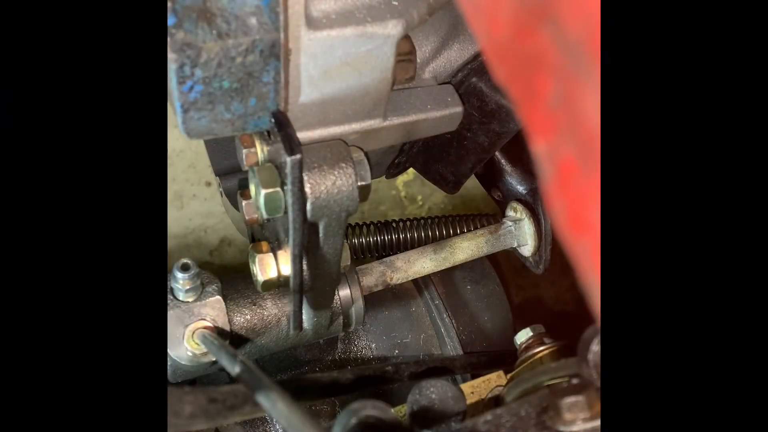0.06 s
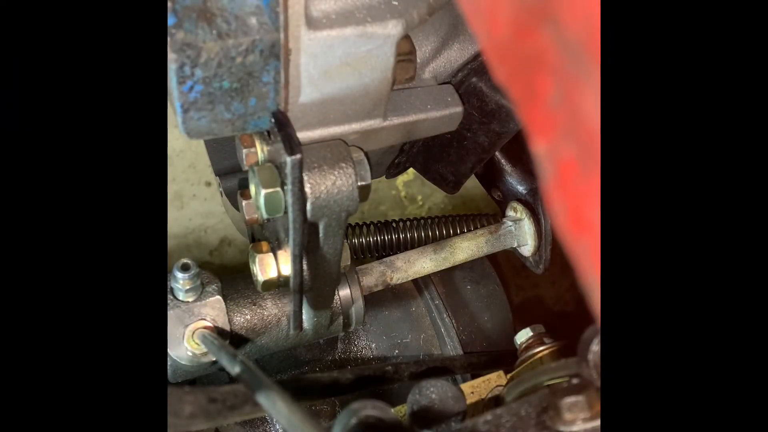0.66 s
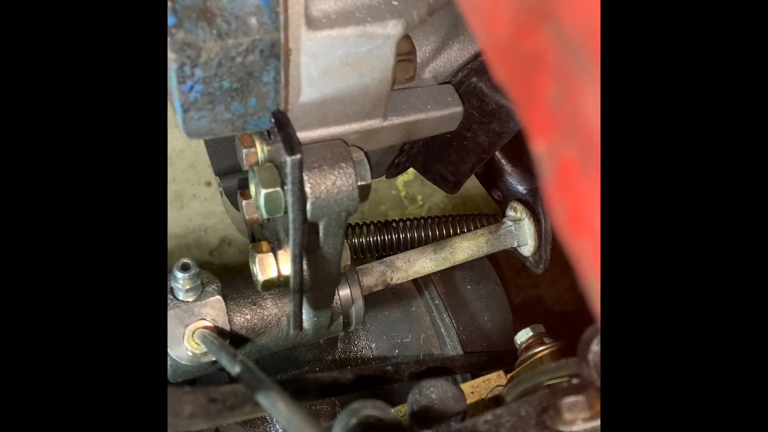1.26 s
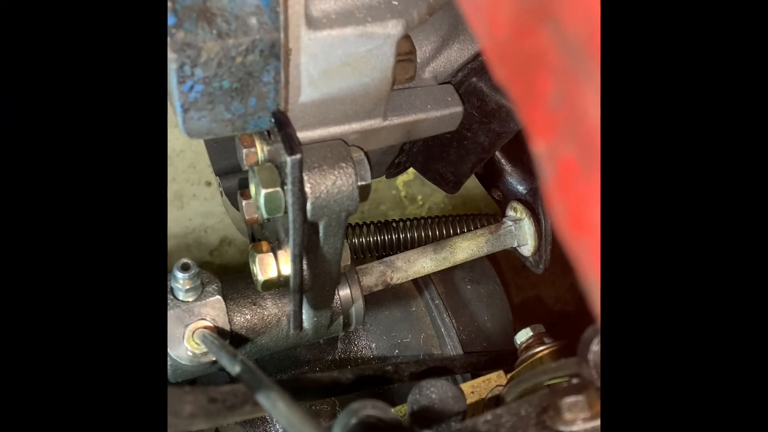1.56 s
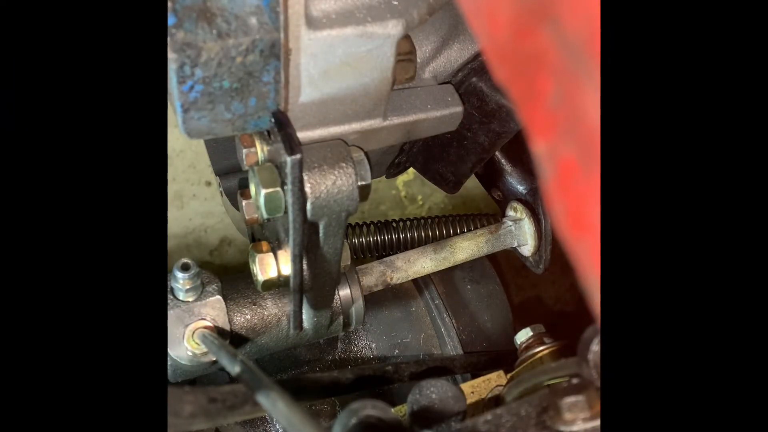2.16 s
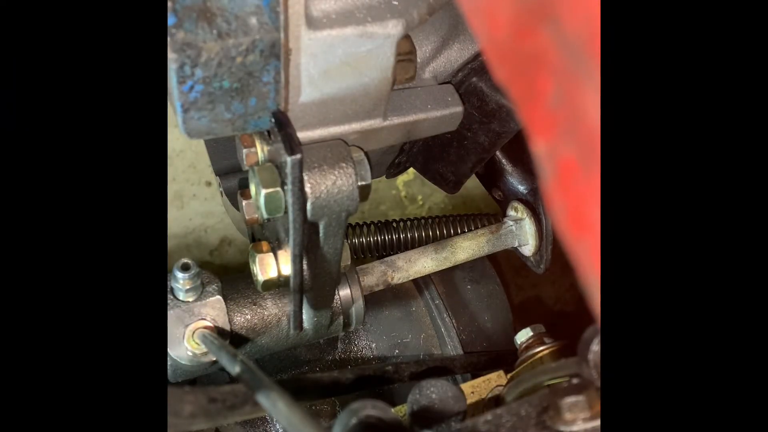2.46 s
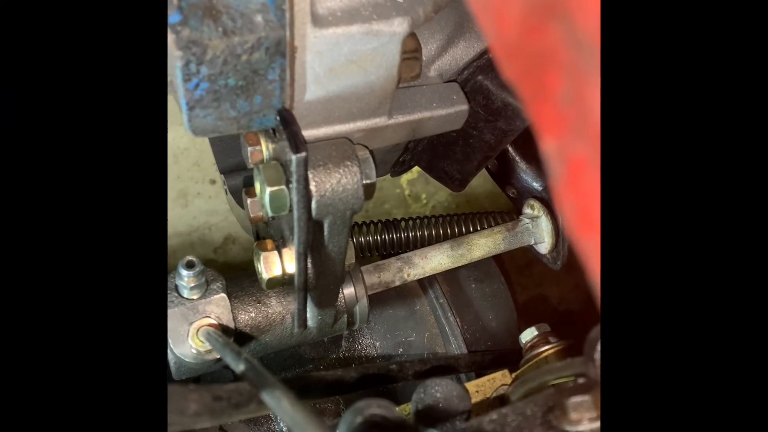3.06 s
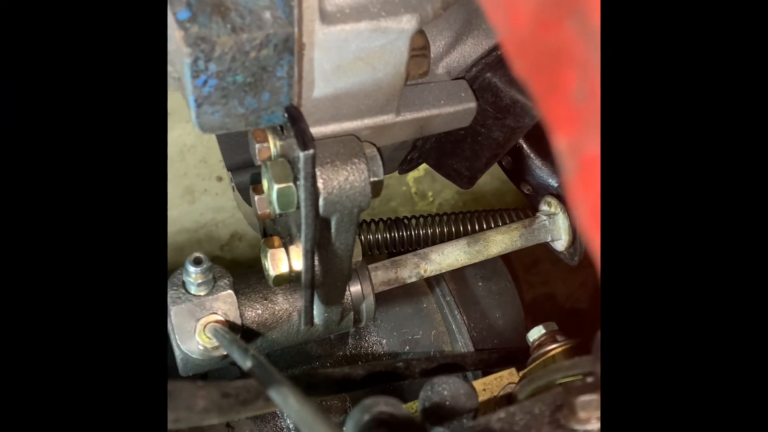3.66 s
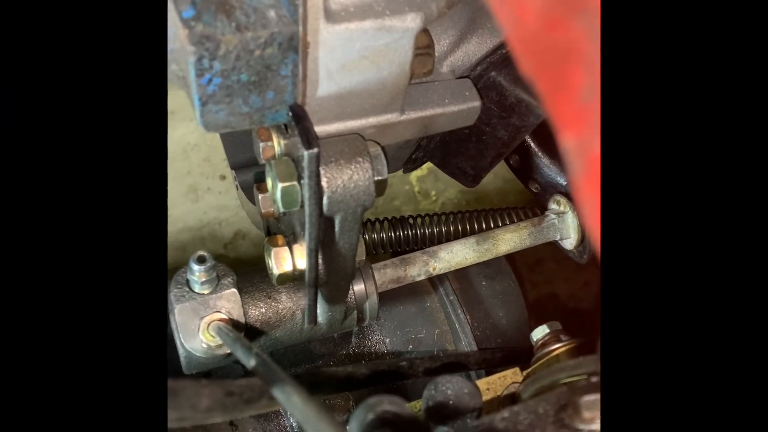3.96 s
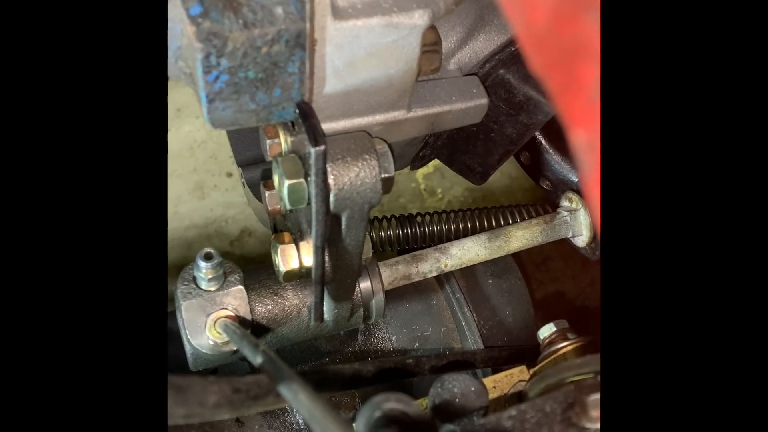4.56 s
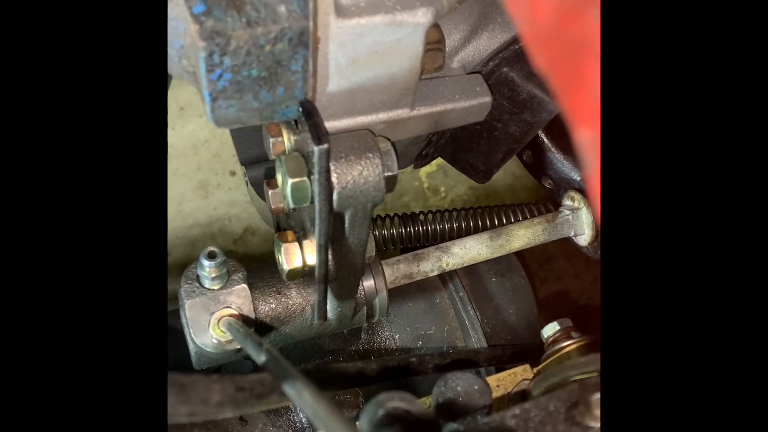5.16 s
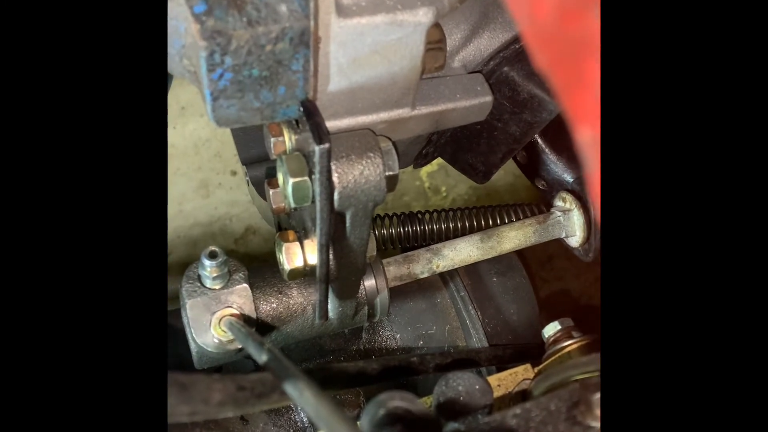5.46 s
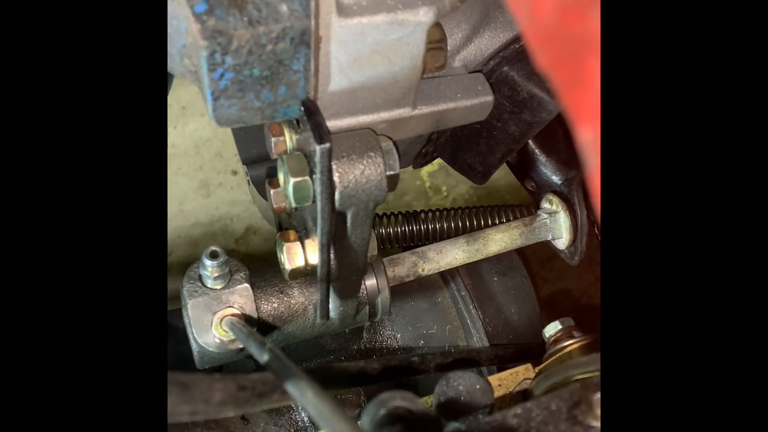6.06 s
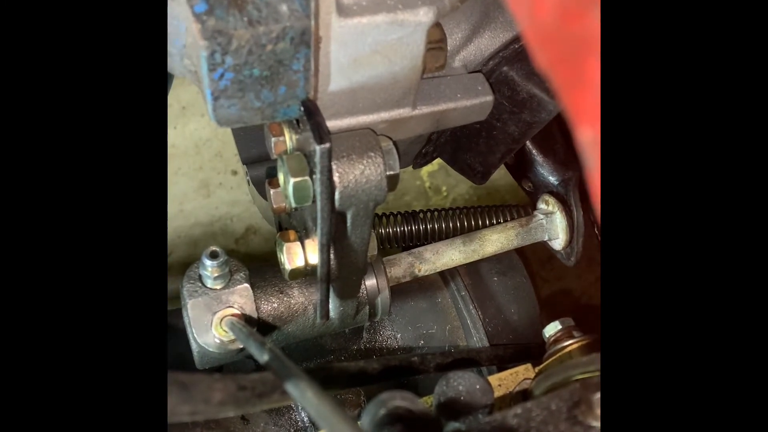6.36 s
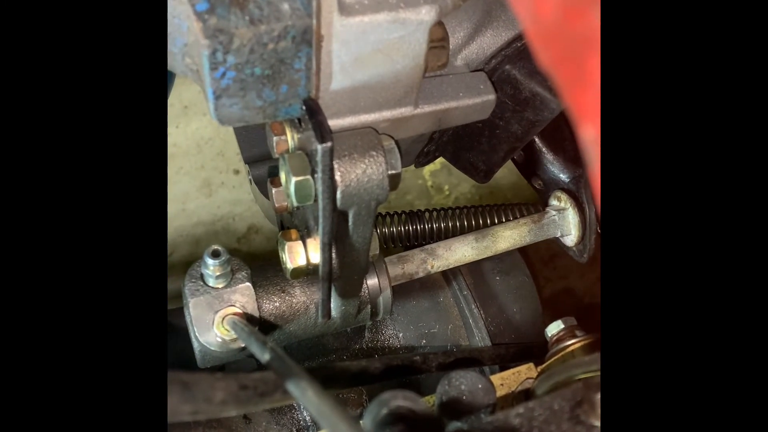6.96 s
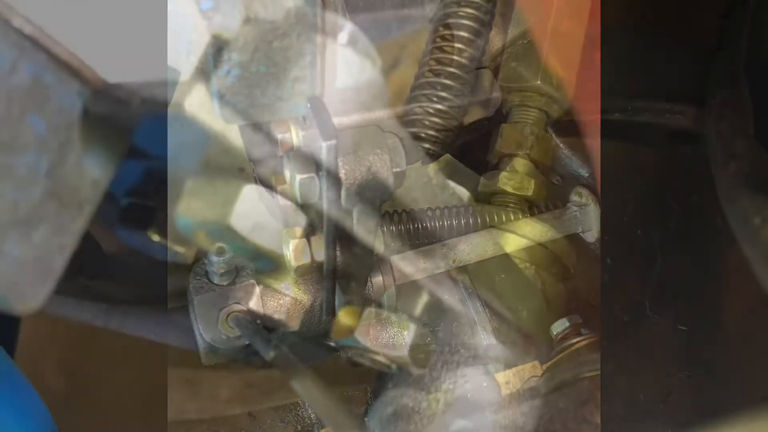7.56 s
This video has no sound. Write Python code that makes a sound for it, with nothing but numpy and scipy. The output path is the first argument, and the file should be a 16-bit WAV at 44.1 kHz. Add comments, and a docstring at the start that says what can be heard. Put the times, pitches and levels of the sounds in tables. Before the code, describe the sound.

Steel linkage clunks, scrapes and judders against a spring, then snaps back, with small ticks and clothing rustling close by.

```python
"""Clothing rustles close by over a quiet workshop rumble, and small steel parts tick under a vehicle.
A clutch push rod is driven out against its return spring: the linkage takes up with a clunk, scrapes,
judders, groans and squeaks once. Let back, the rod rubs and sings, and the lever snaps onto its stop.
Impacts excite damped modes and bursts of noise; sliding friction is a stream of tiny random slips.
Two microphone ports hear the scene with slightly different phase and level."""
import sys
import numpy as np
from scipy import signal
from scipy.fft import rfft, irfft, next_fast_len
from scipy.io import wavfile
from scipy.ndimage import map_coordinates

SR = 44100
rng = np.random.default_rng(int(sys.argv[2]) if len(sys.argv) > 2 else 0)


def inscribe(sig):
    """Save sig as 16-bit PCM at rate SR to the path in sys.argv[1].

    A 1-D sig is mono; a 2-D sig holds one channel per row.
    Samples are clipped to [-1, 1] before scaling.
    """
    pcm = np.round(np.clip(np.atleast_2d(sig).T, -1, 1) * 32767)
    wavfile.write(sys.argv[1], SR, pcm.astype(np.int16))


N = 344156
TIME = np.arange(N) / SR
AGE = np.arange(SR * 3 // 4) / SR  # seconds since the onset of one short sound

# modes of the linkage's bracket: pitch_hz, level_db, t60_s
BRACKET_MODES = [(183, -9, 0.3), (274, -3.5, 0.25), (421, -5, 0.2), (549, -1, 0.27), (622, -10, 0.18),
                 (739, -7.5, 0.22), (944, 0.5, 0.21), (1036, -1.5, 0.14), (1200, -0.5, 0.12),
                 (1265, -2, 0.15), (1543, -6, 0.15), (1778, -2, 0.11), (2080, 1.5, 0.09), (2800, -4, 0.07),
                 (3040, -10, 0.08)]
# bright modes of the return spring: pitch_hz, level_db, t60_s
SPRING_MODES = [(3600, -1.5, 0.016), (4080, 6, 0.018), (4800, -6.5, .015), (5400, 0.5, 0.02),
                (6790, -0.5, .018), (8800, -2, 0.0065), (9450, -4.5, .008), (9900, -1, 0.0084),
                (11800, -5, 0.0079), (14650, -5, .007)]
# spectrum of fine friction, in cloth fibres and spring coils: frequency_hz, level_db
HISS_SPECTRUM = [(900, 0), (2500, -0.5), (4000, 2.5), (6000, -1), (9000, -11), (12000, -13), (15500, -18)]


def amp(db):
    """Decibels as an amplitude ratio."""
    return 10 ** (np.asarray(db) / 20)


def unit(x):
    """Normalisation to rms 1."""
    return x / np.sqrt(np.mean(x ** 2) + 1e-20)


def along(points, hz):
    """Interpolation of (frequency_hz, value) points on a logarithmic frequency axis."""
    frequencies, values = np.transpose(points)
    return np.interp(np.log(hz + 1), np.log(frequencies + 1), values)


def filtered(x, response):
    """Linear filtering: the spectrum of x times a frequency response."""
    n = x.shape[-1]
    padded = next_fast_len(n + SR // 4)
    return irfft(rfft(x, padded) * response(np.fft.rfftfreq(padded, 1 / SR)), padded)[..., :n]


def coloured(x, spectrum):
    """Spectral shaping by (frequency_hz, level_db) points, at rms 1."""
    return unit(filtered(x, lambda hz: amp(along(spectrum, hz))))


def noise(spectrum, size=len(AGE)):
    """Gaussian noise with a given spectrum, at rms 1."""
    return coloured(rng.standard_normal(size), spectrum)


def fade(t60_s):
    """Exponential decay, by 60 dB in t60_s."""
    return np.exp(-np.log(1000) * AGE / max(t60_s, 1e-3))


def swell(rise_s):
    """Exponential build-up with time constant rise_s."""
    return 1 - np.exp(-AGE / max(rise_s, 1e-5))


def gesture(start_s, attack_s, length_s, release_s):
    """A movement's envelope: smooth attack, hold until length_s after the start, exponential release."""
    age = TIME - start_s
    rise = np.sin(np.pi / 2 * np.clip(age / max(attack_s, 1e-3), 0, 1)) ** 2
    return rise * np.exp(-np.maximum(age - length_s, 0) / max(release_s, 1e-3))


def bell_curve(x, centre, width):
    """A Gaussian window of height 1."""
    return np.exp(-.5 * ((x - centre) / width) ** 2)


def wander(per_s):
    """Random modulation: a smooth curve through per_s random values a second."""
    return map_coordinates(rng.standard_normal(1024), [TIME * per_s], mode="mirror")


def add(track, start_s, sound):
    """Superposition of a sound on the track."""
    part = track[round(start_s * SR):][:len(sound)]
    part += sound[:len(part)]


def ring(modes):
    """Free vibration: damped modes of slightly random strength, starting at rms 1."""
    strengths = amp(np.array(modes)[:, 1] + rng.standard_normal(len(modes)))
    waves = [np.sin(2 * np.pi * (hz * AGE + rng.random())) * fade(t60_s) for hz, _, t60_s in modes]
    return strengths @ waves / np.sqrt(np.sum(strengths ** 2) / 2)


def resonate(x, modes):
    """Forced vibration: x convolved with the modes' impulse response, at rms 1."""
    return unit(signal.fftconvolve(x, ring(modes))[:N])


def bands(x, count=14):
    """A filter bank of overlapping bands that sum to x: (centre_hz, signal) pairs."""
    centres = np.geomspace(40, 16000, count)
    return [(c, filtered(x, lambda hz: along(np.c_[centres, centres == c], hz))) for c in centres]


def clang(spectrum, decay, cycles):
    """Modal overlap: noise bands build up over some cycles and decay by (frequency_hz, t60_s) points."""
    return sum(x * swell(cycles / hz) * fade(along(decay, hz)) for hz, x in bands(noise(spectrum)))


def friction(per_s, spread_db, smooth):
    """Friction as shot noise: random slips of uneven size over a smooth hiss."""
    impulses = (rng.random(N) < per_s / SR) * rng.choice([-1, 1], N)
    slips = impulses * amp(spread_db * rng.standard_normal(N))
    return unit(unit(slips) + smooth * rng.standard_normal(N))


def workshop(x, wet_db, rise_s):
    """Reverberation: the underbody, floor and walls add a diffuse tail."""
    # reverberation times: frequency_hz, t60_s
    room_decay = [(100, 0.37), (500, 0.6), (2000, 0.54), (6000, 0.42), (14000, 0.15)]
    tail = clang([(100, 2), (4000, -0.58), (15000, -1.8)], room_decay, cycles=1) * swell(rise_s)
    return x + amp(wet_db) * signal.fftconvolve(x, tail / np.linalg.norm(tail))[:N]


def rumble(fade_start_s=7.475, fade_db_per_s=62):
    """Ambient noise: the workshop's low background wanders slightly in level; from about 7.5 s the background
    fades out."""
    # background spectrum: frequency_hz, level_db
    spectrum = [(25, -28.5), (58, -4), (110, -5.5), (170, -2.5), (300, -2), (430, -2), (700, -11),
                (1050, -9.5), (1550, -18), (1850, -13.5), (2400, -24), (4200, -28), (7000, -41),
                (15500, -48.5)]
    level_db = -53.5 - 0.9 * wander(per_s=3.8) - fade_db_per_s * np.maximum(TIME - fade_start_s, 0)
    return amp(level_db) * noise(spectrum, size=N)


def rustle():
    """Friction noise of cloth: in each stroke the folds sound low while the fibres catch and hiss."""
    # strokes of cloth: start_s, length_s, hiss_db, body_over_hiss_db
    strokes = [(-.05, 0.21, -66.5, -5), (0.388, 0.3, -61.5, -13), (0.943, 0.16, -70, -1),
               (1.079, 0.025, -44, 1), (1.351, 0.096, -56.5, 10), (1.555, 0.13, -50.5, -6),
               (1.849, 0.038, -42, -11), (2.8, 0.22, -57.5, 9.5), (3.523, 0.28, -66, 12),
               (3.813, 0.21, -62.5, 11.5), (4.44, 0.2, -72.5, 1), (5.93, 0.085, -65, -6),
               (6.494, 0.095, -64, 11.5), (7.408, 0.12, -62.5, 7), (7.51, 0.04, -60.5, 12.5)]
    # spectrum of the folds: frequency_hz, level_db
    fold_spectrum = [(70, -15.5), (160, -3.5), (285, 6.5), (450, -1), (800, -7), (1300, -8), (2200, -17.5),
                     (4000, -32)]
    body, hiss = np.zeros(N), np.zeros(N)
    for start_s, length_s, hiss_db, body_over_hiss_db in strokes:
        stroke = amp(hiss_db) * gesture(start_s, 0.48 * length_s, length_s, release_s=0.045)
        hiss = np.hypot(hiss, stroke)  # incoherent sources add in power
        body = np.hypot(body, stroke * amp(body_over_hiss_db))
    uneven_drag = amp(1.5 * wander(per_s=39))
    folds = coloured(friction(per_s=1400, spread_db=1.5, smooth=0.93), fold_spectrum)
    fibres = coloured(friction(per_s=1100, spread_db=3.5, smooth=0.8), HISS_SPECTRUM)
    return uneven_drag * (amp(1) * body * folds + amp(2.5) * hiss * fibres)


def ticks():
    """Impulse excitation: shifting pins and coils click and ring the spring, over a longer knock."""
    # small steel contacts: start_s, click_db, knock_db
    contacts = [(0.4932, -41.5, -39), (0.6164, -41.5, -44), (1.083, -42, -33), (1.8698, -28, -34),
                (2.2236, -31.5, -39), (2.474, -60, -36.5), (2.8623, -50, -34), (3.673, -35, -50),
                (3.6854, -26.5, -40), (3.692, -30, -49), (3.7436, -33.5, -46), (3.787, -32.5, -59),
                (3.975, -38, -40), (4.6214, -44, -61), (4.6631, -38.5, -54), (4.675, -42, -52),
                (4.774, -41, -46), (4.8289, -42, -55), (4.846, -42, -41), (4.873, -43, -40.5),
                (5.9417, -36.5, -45), (5.9725, -43, -51), (6.0125, -33.5, -43), (6.0233, -42, -32),
                (6.0543, -38, -34), (6.5224, -30.5, -45)]
    click_spectrum = [(1200, -22.5), (2500, -4.5), (4500, 5.5), (8000, -2.5), (12000, -8), (15500, -12)]
    out = np.zeros(N)
    for start_s, click_db, knock_db in contacts:
        click = amp(-10) * noise(click_spectrum) * fade(0.036) + amp(-11) * ring(SPRING_MODES)
        knock = amp(-8.5) * noise([(150, -12.5), (400, 3), (2200, 8.5), (4500, -25.5)]) * fade(0.079)
        add(out, start_s, (amp(click_db) * click + amp(knock_db) * knock) * swell(0.00084))
    return workshop(out, wet_db=-13, rise_s=0.01)


def knocks():
    """Stick-slip: the loaded linkage jumps; hard jumps mostly thump the chassis, light ones clatter."""
    # jumps of the linkage: start_s, level_db, pitch_hz
    jumps = [(2.474, -39, 398), (.494, -45, 290), (2.841, -35, 274), (2.870, -15.5, 274), (2.897, -23, 277),
             (2.928, -16.5, 277.4), (2.964, -19, 265), (3.013, -15.5, 274), (3.070, -36, 255),
             (3.674, -40, 290), (4.037, -26, 170), (4.582, -55, 273), (5.653, -33, 347), (6.06, -38.5, 392),
             (6.089, -19.5, 176), (6.524, -30, 311), (6.742, -25, 272), (6.760, -29.5, 265),
             (7.535, -28, 276)]
    # partials of the chassis: pitch_ratio, level_db
    partials = [(0.599, -11.5), (1, -1), (1.74, -15), (2.8, -28.5)]
    clatter_spectrum = [(90, -22), (220, 10), (600, 3.5), (1200, -10.5), (2200, -16), (5000, -47)]
    out = np.zeros(N)
    for start_s, level_db, pitch_hz in jumps:
        thump = sum(amp(db) * np.sin(2 * np.pi * pitch_hz * ratio * AGE) for ratio, db in partials)
        add(out, start_s, amp(level_db + 2) * thump * swell(0.00722) * fade(0.066))
        clatter_db = -41 + 0.16 * (level_db + 30)  # grows far more slowly than the thump
        add(out, start_s, amp(clatter_db) * noise(clatter_spectrum) * swell(0.0024) * fade(0.12))
    return workshop(out, wet_db=-17.5, rise_s=0.018)


def coils():
    """Frictional excitation: coils grate over each other in tiny slips that ring the spring."""
    # slides of the coils: start_s, length_s, level_db
    slides = [(1.065, 0.025, -49), (1.845, 0.062, -44), (3.634, 0.15, -53.5), (3.80, 0.23, -54),
              (4.564, 0.44, -64.5)]
    sliding = sum(amp(db) * gesture(s, 0.04, length_s, release_s=0.03) for s, length_s, db in slides)
    slips = friction(per_s=450, spread_db=3.5, smooth=0.7) * amp(2.2 * wander(per_s=45))
    return sliding * (amp(-4) * coloured(slips, HISS_SPECTRUM) + amp(-6.5) * resonate(slips, SPRING_MODES))


def take_up(clunk_s=1.1742, chatter_s=1.212):
    """Backlash impact: the slack closes with a clunk that rings the bracket; the loose joint chatters."""
    # spectrum of the clunk: frequency_hz, level_db
    clunk_spectrum = [(60, -57), (130, -20), (260, 8.5), (420, -6), (1000, -9.5), (1800, -8.5), (2400, -19),
                      (6500, -28.5), (11000, -53), (15500, -50)]
    out = np.zeros(N)
    body = clang(clunk_spectrum, decay=[(200, 0.22), (7000, 0.28)], cycles=3.9)
    crack = noise([(400, -22), (1000, 1), (3900, 2.5), (7000, -9), (10000, -22), (15000, -37)])
    bracket = ring(BRACKET_MODES) * swell(0.002)
    add(out, clunk_s, amp(-20) * (body + crack * fade(0.093)) + amp(-20.5) * bracket)
    chatter = noise([(100, -11.5), (260, 1), (1500, -11), (7000, -18), (15000, -36.5)])
    add(out, chatter_s, amp(-33.5) * chatter * swell(0.011) * fade(0.34))
    return workshop(out, wet_db=-14.5, rise_s=0.0032)


def rod_out():
    """Sliding friction: the rod scrapes outwards in surges, and its dull slips ring the bracket."""
    # surges of the rod: start_s, level_db
    surges = [(1.592, -36.5), (1.691, -36), (2.955, -49)]
    push = sum(amp(db) * gesture(s, attack_s=0.038, length_s=0.074, release_s=0.034) for s, db in surges)
    # spectrum of the scrape: frequency_hz, level_db
    scrape_spectrum = [(80, -20), (270, 1), (650, -2.5), (1150, 1.5), (2100, -7.5), (2500, -10),
                       (3400, -13.5), (6500, -37), (15500, -69)]
    grating = coloured(friction(per_s=450, spread_db=2, smooth=0.6), scrape_spectrum)
    return push * (amp(-3) * grating + amp(-1) * resonate(grating, BRACKET_MODES))


def groan():
    """Forced resonance: the loaded linkage creeps, and its slips drive the low modes of the chassis."""
    # spells of creep: start_s, length_s, level_db
    creeps = [(2.866, 0.17, -41), (3.865, 0.09, -48.5), (3.958, 0.091, -45)]
    # modes of the chassis: pitch_hz, level_db, t60_s
    chassis_modes = [(165, 2, 0.076), (276, 3, 0.1), (480, -4.5, 0.019)]
    slips = friction(per_s=300, spread_db=0, smooth=0.52)
    dull_slips = coloured(slips, [(70, -17), (190, -2), (600, -2), (3000, -5)])
    load = sum(amp(db) * gesture(s, 0.044, length_s, release_s=0.029) for s, length_s, db in creeps)
    return load * resonate(dull_slips, chassis_modes)


def squeak(peak_s=4.252, width_s=0.0036):
    """Friction-induced vibration: a dry pivot slips in one very short burst of tones and rasp."""
    # tones of the pivot: pitch_hz, level_db
    pivot_tones = [(1280, -4), (1620, -13), (1960, 0), (2280, -1), (3340, -2), (3980, -9), (5990, -4),
                   (7490, -15), (10600, -28)]
    slips = friction(per_s=1655, spread_db=5, smooth=0.41)
    rasp = coloured(slips, [(300, -25), (1300, -4), (3500, -10), (7500, -10), (15000, -29)])
    tones = unit(sum(amp(db) * np.sin(2 * np.pi * (hz * TIME + rng.random())) for hz, db in pivot_tones))
    burst = bell_curve(TIME, peak_s, width_s) * (amp(-38.5) * tones + amp(-39.5) * rasp)
    return workshop(burst, wet_db=-26, rise_s=0.0022)


def rod_back():
    """Light sliding friction: the returning rod rubs, catches once and rings, then rubs as it seats."""
    # spectrum of the rub: frequency_hz, level_db
    rub_spectrum = [(90, -10), (280, 3.5), (620, -2.5), (1200, -10), (2500, -20), (7000, -36),
                    (12000, -60.5)]
    # modes of the rod: pitch_hz, level_db, t60_s
    rod_modes = [(550, -3, 0.18), (603, -3, 0.12), (1935, 5, 0.06)]
    easing = amp(-45) * gesture(4.92, attack_s=0.2, length_s=0.29, release_s=0.21)
    catch = amp(-42.5) * gesture(5.648, attack_s=0.0052, length_s=0.017, release_s=0.019)
    seating = amp(-52.5) * gesture(6.7, attack_s=0.25, length_s=0.25, release_s=0.036)
    slips = friction(per_s=1700, spread_db=1, smooth=0.84) * amp(1.2 * wander(per_s=27))
    rubbing = coloured(slips, rub_spectrum)
    return (easing + seating) * rubbing + catch * resonate(rubbing, rod_modes)


def rod_song(waver_hz=6, flutter_db=3, chirp_hz=1900, chirp_s=5.304, chirp_width_s=0.011):
    """Friction-sustained vibration: the rubbed rod's tones waver; a chirp flares near the highest."""
    # tones of the rod: pitch_hz, level_db
    rod_tones = [(552, 0), (597, -3.5), (1880, -14.5)]
    song = np.zeros(N)
    for pitch_hz, level_db in rod_tones:
        cycles = np.cumsum(pitch_hz + waver_hz * wander(per_s=40)) / SR
        song += amp(level_db + flutter_db * wander(per_s=20)) * np.sin(2 * np.pi * cycles)
    bowing = amp(-50) * gesture(4.933, attack_s=0.18, length_s=0.39, release_s=0.28)
    flare = amp(-50.5) * bell_curve(TIME, chirp_s, chirp_width_s)
    rasp = unit(wander(per_s=260) * np.sin(2 * np.pi * chirp_hz * TIME))
    return bowing * unit(song) + flare * rasp


def sinking_swish(hiss_hz=2540, shudder_hz=64.6, width_octaves=0.98, sink_s=6.06, sink_width_s=0.0308):
    """Swept noise: a swish sinks from a hiss to a low shudder; a separate low rumble swells afterwards."""
    sunk = (1 + np.tanh((TIME - sink_s) / sink_width_s)) / 2
    centre_octave = np.log2(hiss_hz) + sunk * np.log2(shudder_hz / hiss_hz)
    parts = bands(friction(per_s=1500, spread_db=6, smooth=0.49))
    weights = np.array([bell_curve(np.log2(hz), centre_octave, width_octaves) for hz, _ in parts])
    band_noise = sum(w * unit(x) for w, (_, x) in zip(weights, parts)) / np.linalg.norm(weights, axis=0)
    swish = amp(-49 + 10 * sunk) * gesture(6.01, attack_s=0.013, length_s=0.1, release_s=0.16)
    low_rumble = amp(-51) * gesture(6.46, attack_s=0.09, length_s=0.11, release_s=0.3)
    return np.hypot(swish, low_rumble) * band_noise


def snap_home(blow_s=6.635, rebound_s=6.6378):
    """Impact and rebound: the spring throws the steel lever onto its stop, and the lever rings."""
    # spectrum of the blow: frequency_hz, level_db
    blow_spectrum = [(60, -24.5), (120, -17.5), (200, 2), (450, -5.5), (720, -5.5), (1000, -8), (1500, -3),
                     (2500, -2.5), (3450, 2.5), (4500, -7), (5600, -3), (8500, -7), (11500, -7),
                     (16000, -18.5)]
    # modes of the lever: pitch_hz, level_db, t60_s
    lever_modes = [(215.5, -14.5, 0.074), (285, -14.5, 0.12), (572, -6, 0.1), (762, -6, 0.091),
                   (1526, -9, .08), (2140, -11, 0.14), (2433, -2, 0.054), (3040, -1.5, .045),
                   (3390, 5.5, .032), (3595, -9.5, 0.17), (5670, 10, 0.024), (6850, -3.5, 0.12),
                   (7250, 1, 0.036), (7300, -7, .11), (9570, 2, .03), (11480, -6.5, .08),
                   (13400, -2.5, .02), (14900, -6, .025)]
    decay = [(200, 0.12), (700, 0.15), (3000, 0.041), (12000, 0.047)]
    blows, lever = np.zeros(N), np.zeros(N)
    for start_s, level_db in [(blow_s, -11), (rebound_s, -14)]:
        add(blows, start_s, amp(level_db) * clang(blow_spectrum, decay, cycles=0.74))
        add(lever, start_s, amp(level_db + 0.5) * ring(lever_modes) * swell(0.00038))
    # the broad blow fills the workshop; the small lever's ring is heard only directly
    return workshop(blows, wet_db=-14, rise_s=0.0022) + lever


def ports(x):
    """Partial coherence: nearby metal reflects differently into two ports, offset in phase and level."""
    # likeness of the two ports: frequency_hz, correlation
    likeness = [(100, .98), (400, .9), (750, .3), (1300, .4), (2800, .87), (5000, .98)]
    # phase by which the left port leads: frequency_hz, lead_rad
    phase_lead = [(0, 0), (450, -.45), (950, .6), (1400, -.2), (2500, 1.5), (3600, 1.5), (4700, 3.14),
                  (13300, 15.7), (16000, 19.4)]
    # level of the left port over the right: frequency_hz, difference_db
    balance = [(350, -1.7), (700, -3), (2500, -1.3), (5000, .2)]
    scatter = rng.standard_normal(len(AGE)) * fade(0.12) * swell(0.002)
    diffuse = signal.fftconvolve(x, scatter / np.linalg.norm(scatter))[:N]
    mix_angle = lambda hz: np.arccos(np.clip(along(likeness, hz), 0, 1)) / 2
    common = filtered(x, lambda hz: np.cos(mix_angle(hz)))
    difference = filtered(diffuse, lambda hz: np.sin(mix_angle(hz)))
    sides = np.array([[1], [-1]])  # left, right
    gain = lambda hz: amp(sides * along(balance, hz) / 2)
    phase = lambda hz: sides * np.interp(hz, *np.transpose(phase_lead)) / 2
    return filtered(common + sides * difference, lambda hz: gain(hz) * np.exp(1j * phase(hz)))


def scene():
    """Superposition of impacts, sliding, cloth and rumble at the two microphone ports."""
    impacts = take_up() + snap_home() + ticks() + knocks()
    sliding = rod_out() + groan() + rod_back() + rod_song() + coils() + squeak()
    return ports(impacts + sliding + sinking_swish() + rustle() + rumble())


def record(dry, low_cut_hz=36, high_cut_hz=15900):
    """Band limiting: a high-pass thins the deepest bass and a steep low-pass removes the top treble."""
    thinned = filtered(dry, lambda hz: hz ** 5 / np.hypot(hz ** 5, low_cut_hz ** 5))
    return filtered(thinned, lambda hz: 1 / np.hypot(1, (hz / high_cut_hz) ** 70))


dry = scene()
out = record(dry)
inscribe(out)
```